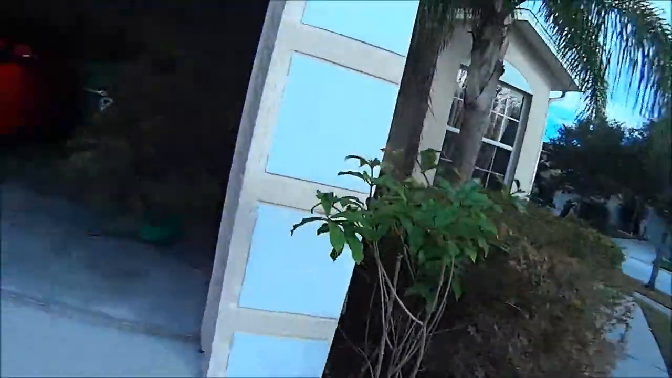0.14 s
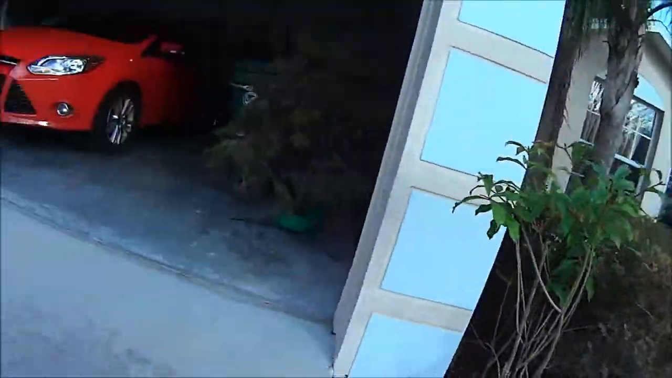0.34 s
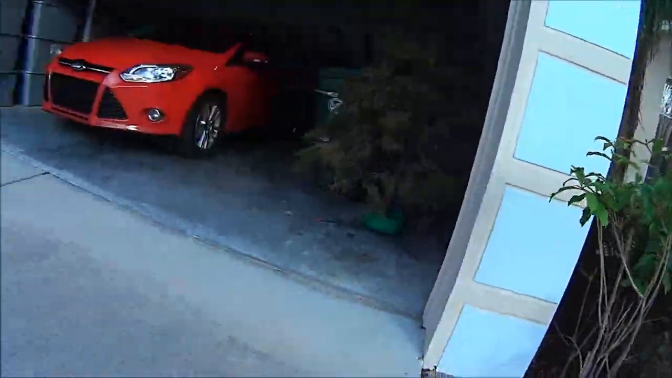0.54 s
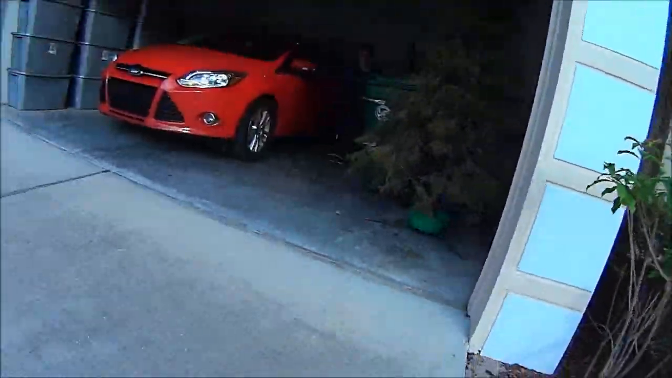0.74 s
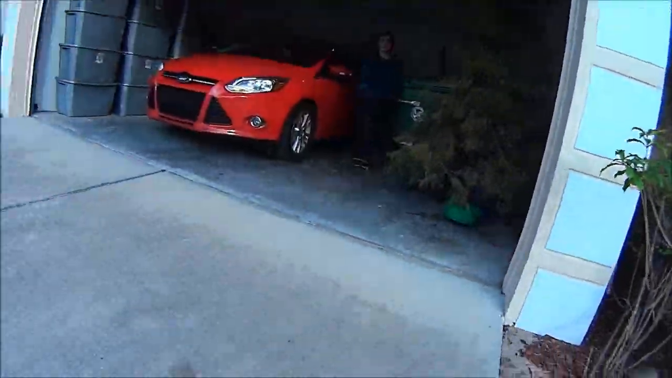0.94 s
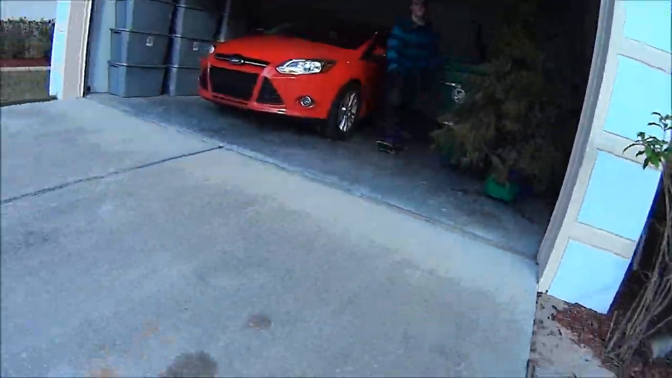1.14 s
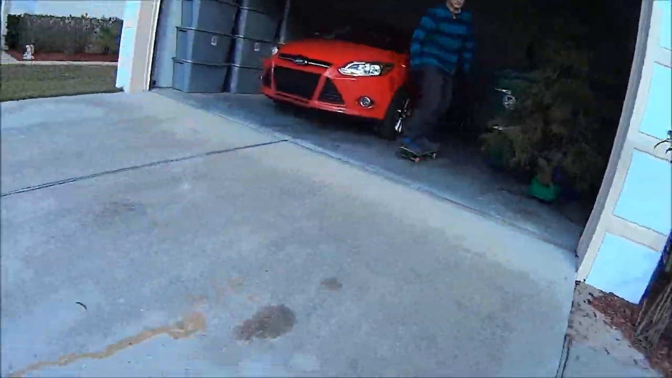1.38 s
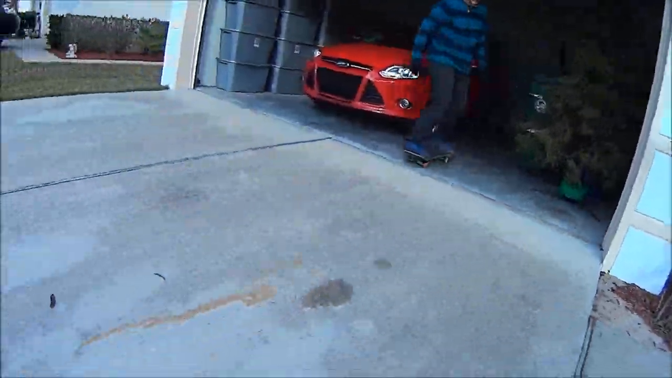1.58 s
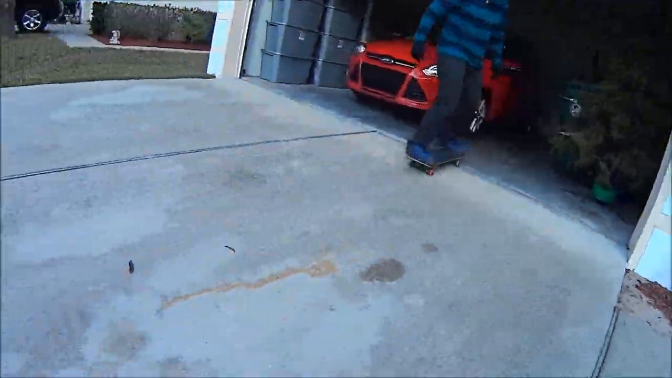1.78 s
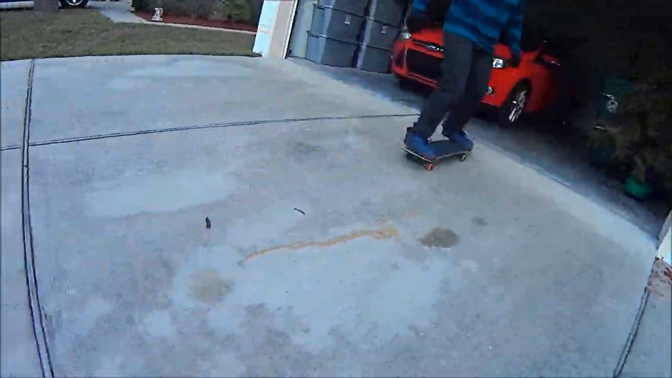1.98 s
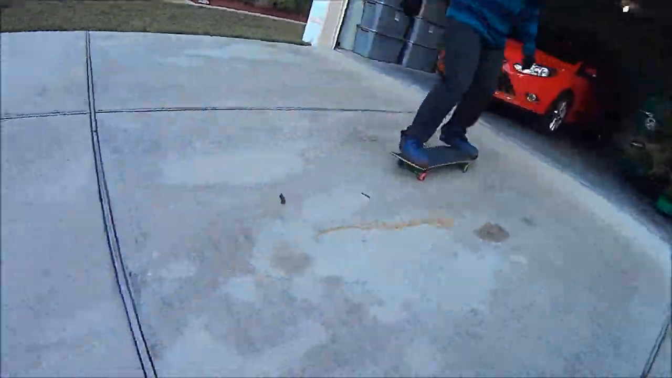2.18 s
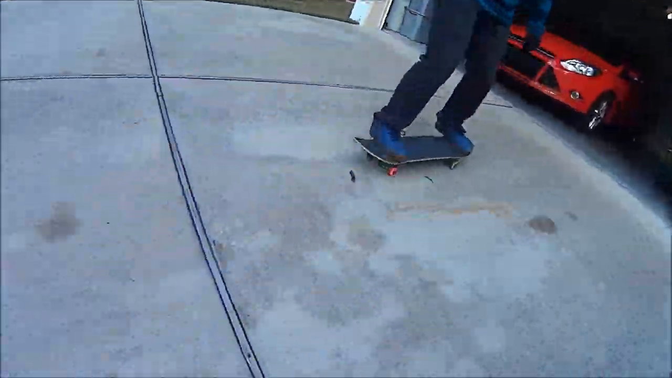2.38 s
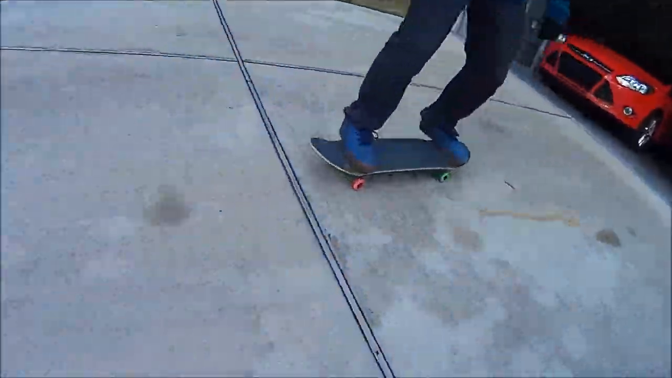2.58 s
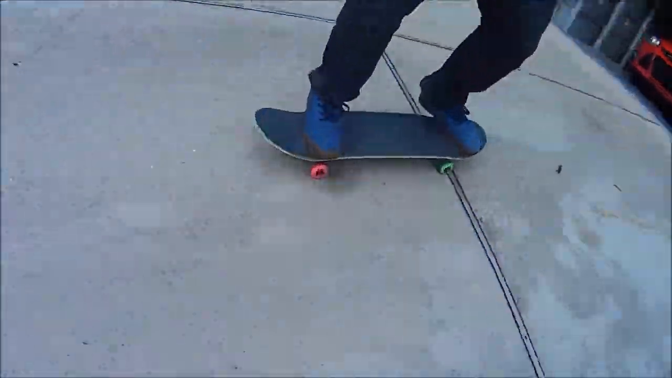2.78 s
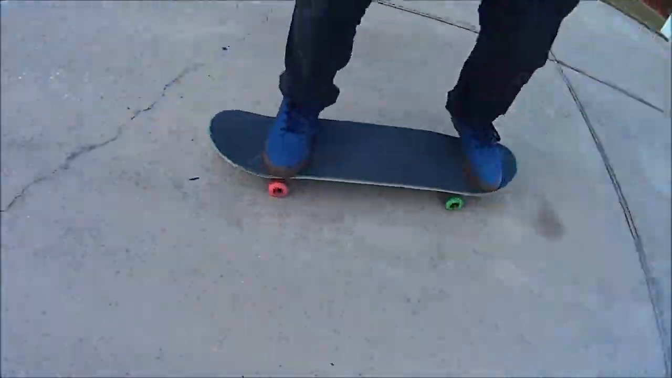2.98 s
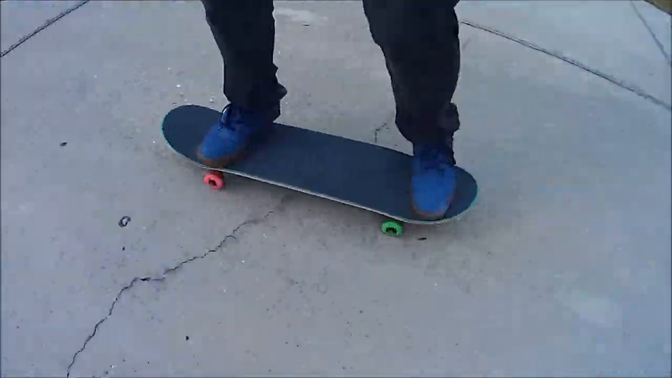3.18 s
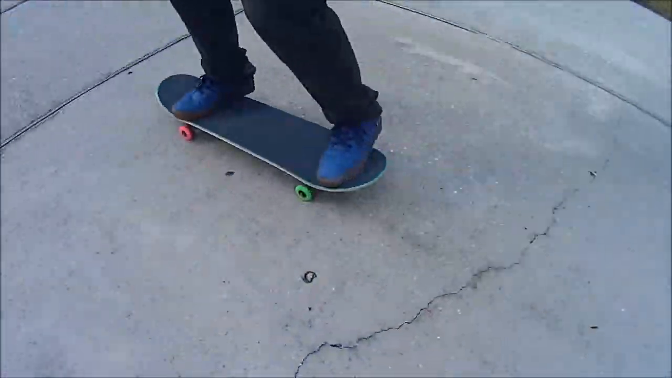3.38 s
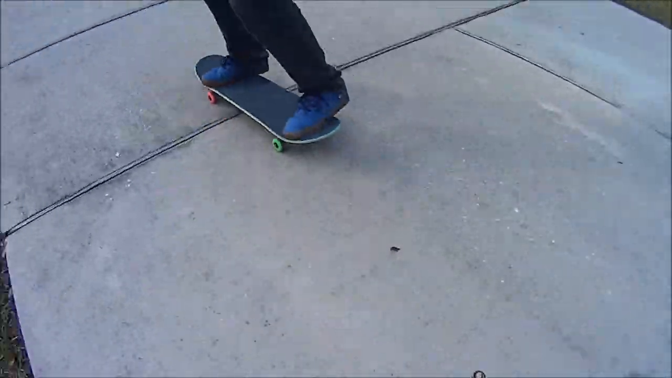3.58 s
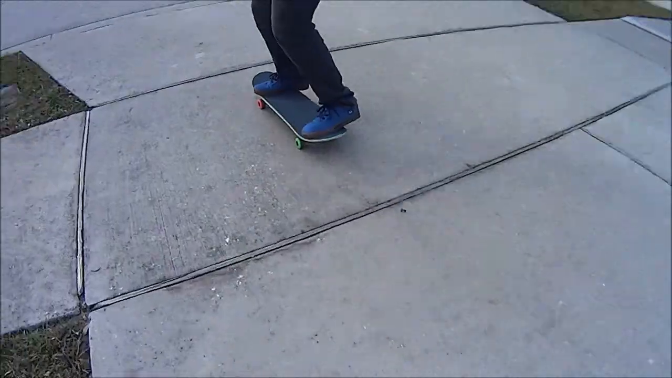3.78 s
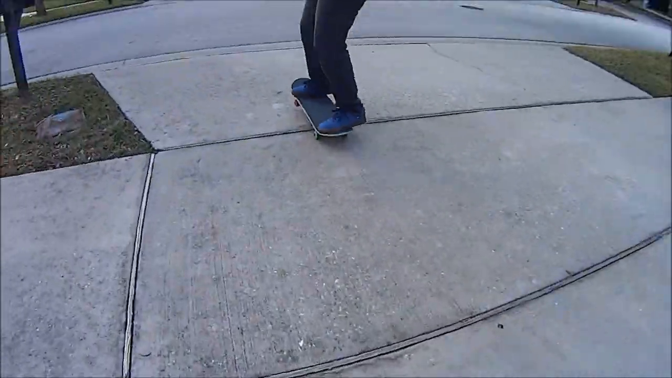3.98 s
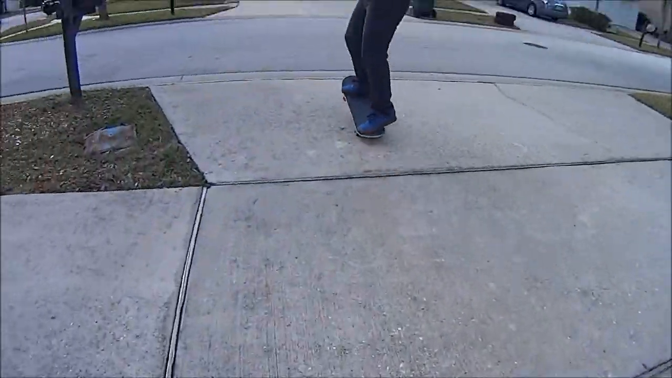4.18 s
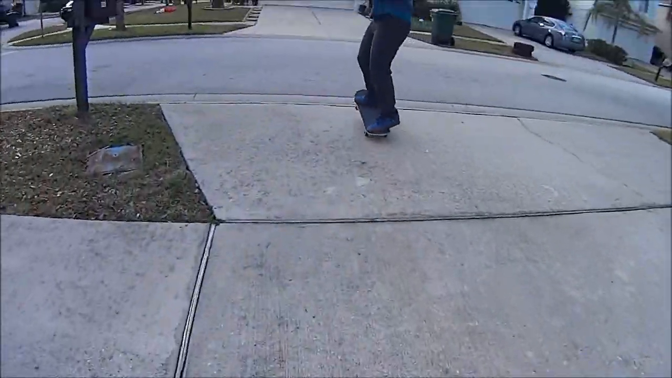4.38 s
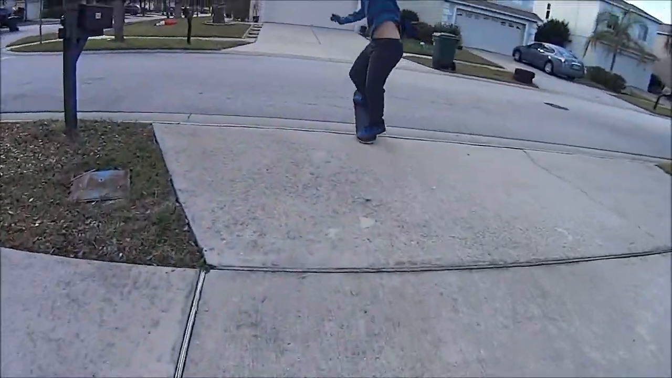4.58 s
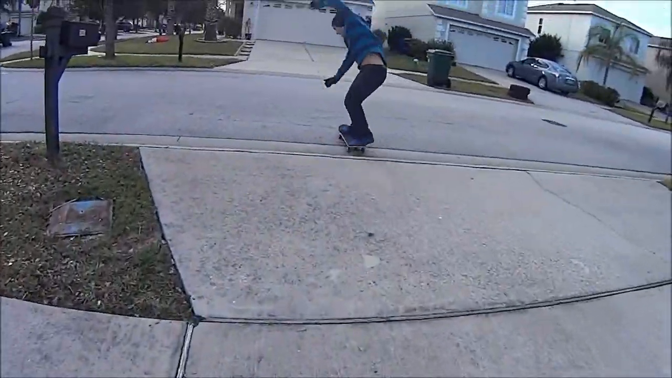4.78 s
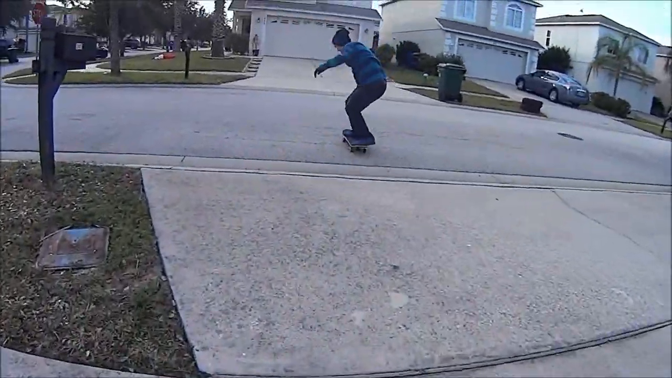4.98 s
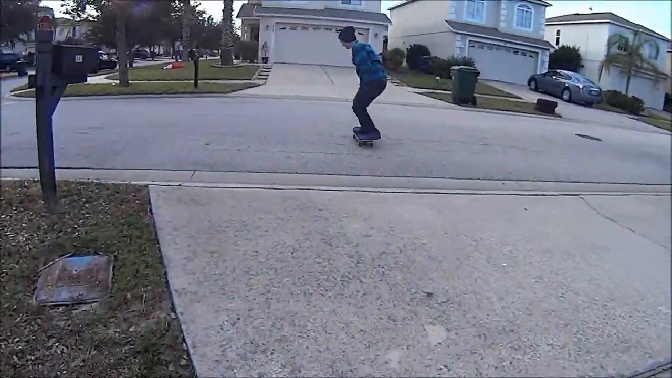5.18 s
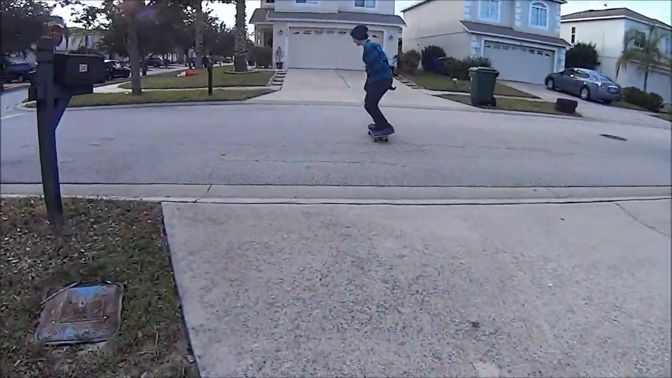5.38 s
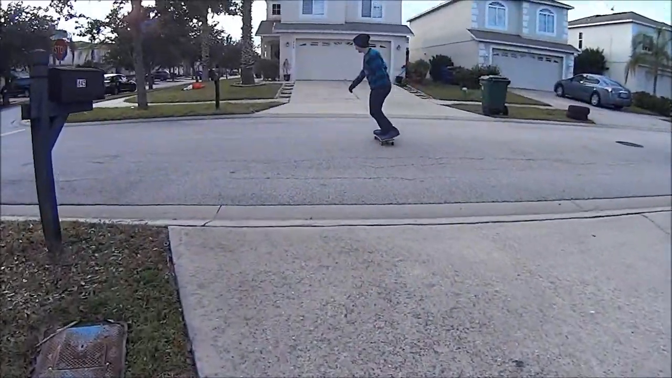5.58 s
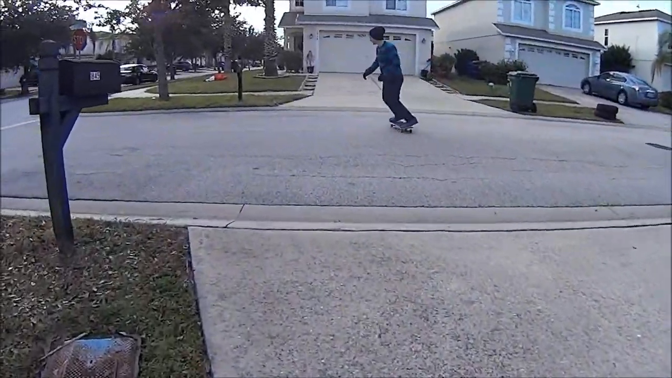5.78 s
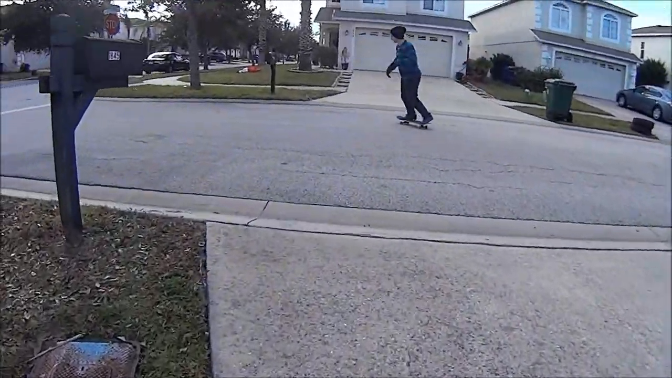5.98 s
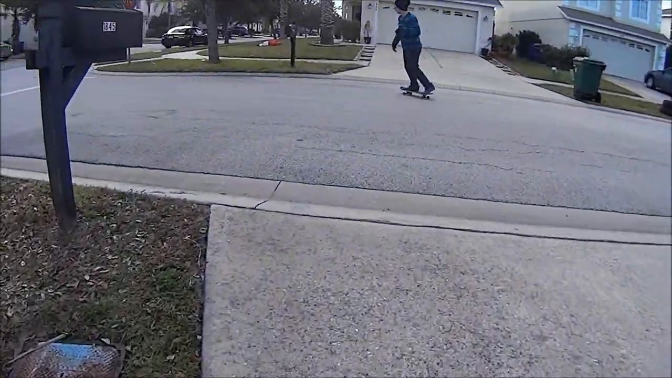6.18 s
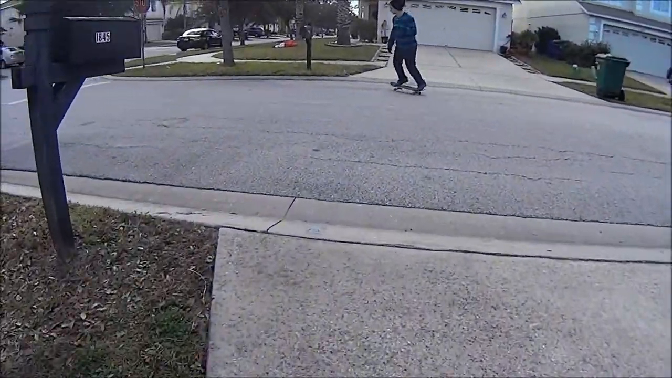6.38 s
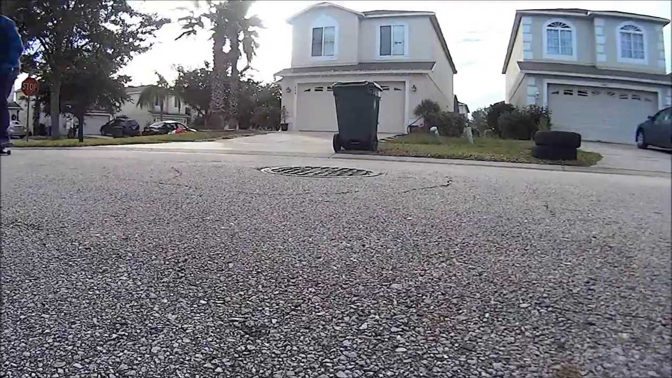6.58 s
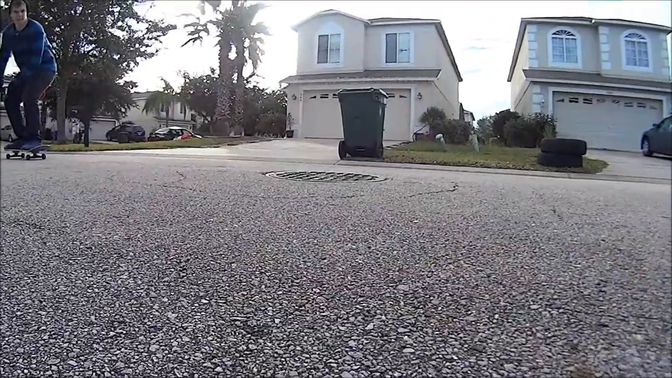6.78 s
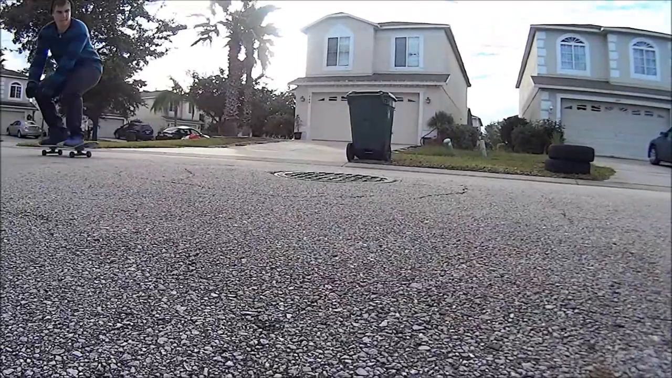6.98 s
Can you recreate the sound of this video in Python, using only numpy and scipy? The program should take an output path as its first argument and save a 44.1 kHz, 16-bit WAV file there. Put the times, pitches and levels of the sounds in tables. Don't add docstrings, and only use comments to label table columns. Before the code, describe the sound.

A skateboard starts faintly in a garage, rolls across a concrete drive and passes very close at about three seconds. Gritty rumble, hard clacks at slab joints, ticking stones and a dry pebble crack peak there, then recede onto the street. After an abrupt cut, the board rolls quietly on asphalt. The hand-held stereo microphones are sealed in a case, giving a hollow, ringing midrange tone over steady hiss and light low wind.

```python
import sys
import numpy as np
from scipy import signal
from scipy.fft import rfft, irfft, next_fast_len
from scipy.io import wavfile
from scipy.ndimage import uniform_filter1d

SR = 44100
rng = np.random.default_rng(int(sys.argv[2]) if len(sys.argv) > 2 else 0)


def unload_audio(sound):
    columns = np.transpose(np.atleast_2d(sound))
    steps = np.round(np.clip(columns, -1, 1) * 32767)
    wavfile.write(sys.argv[1], SR, steps.astype(np.int16))


def nominal_scale(level):
    x = np.asarray(level, float) / 20
    return 10 ** x


N = 310722


def evened(x):
    return x / np.sqrt(np.mean(x ** 2) + 1e-20)


def add(mix, start_s, sound):
    part = mix[..., round(start_s * SR):][..., :sound.shape[-1]]
    part += sound[..., :part.shape[-1]]


def wander(hz):
    lowpass = signal.butter(2, hz, fs=SR, output="sos")
    return evened(signal.sosfilt(lowpass, rng.standard_normal(N)))


def ring(hz, centre_hz, width_hz):
    return 1 / (1 + 2j * (hz - centre_hz) / width_hz) ** 2


# [t/s, rolling level/dB, deck flex/dB, grit coarseness/dB]
DRIVE_RIDE = [(0.0, -54, 3.5, -7), (.42, -50, 5.5, -1), (.58, -40.5, -4.5, -6.5), (.8, -42, -3, -3),
              (1.05, -42, 0.5, 0), (1.4, -40, -2.5, -1.5), (1.8, -38.5, 6, 0.5), (2.58, -29.5, -0.5, 1.5),
              (2.96, -24, 2, -2), (3.14, -25.5, 3.5, 4.5), (3.36, -23, 2, -3), (3.66, -31, 2, 2.5),
              (4.1, -26, -6, -10), (4.67, -35, 4.5, -1.5), (5.05, -36, 2, -3), (5.4, -43, 5.5, 0.5),
              (6.0, -38.5, -3, -2.5), (6.495, -38, 2, 2)]
# [t/s, rolling level/dB, deck flex/dB, grit coarseness/dB]
ASPHALT_RIDE = [
    (6.497, -41, 3.3, 4.3),
    (6.75, -38.5, 7, 3.5),
    (7.046, -40, 9.6, 2),
]
# [t/s, level/dB, fade/s]
SHUDDERS = [
    (1.585, 19, 0.04),
    (1.744, 8, 0.048),
    (2.6, 4, 0.13),
    (3.882, 8, 0.17),
]
# [t/s, level/dB, half length/s]
PAVING = [(0.684, 9, 0.11), (1.26, 2, .06), (2.929, 4.5, 0.067), (4.15, 4.5, 0.043), (3.827, 0, 0.064),
          (3.92, -1, 0.028), (4.663, -8, 0.016), (5.09, 2.5, 0.15), (5.83, 2, 0.033), (6.005, -2, 0.14),
          (6.595, 4.5, 0.044), (5.557, 0.5, 0.19), (6.17, 2.5, .03)]
# [level/dB at the reference, share of rolling, share of flex, share of grit]
LANE_LAW = [
    (-59.5, 0.77, 1.05, 0.47),
    (-52.5, 0.97, 1.2, 0),
    (-35.5, 0.96, 0, 0),
    (-56.5, 0.87, 0, 0.77),
    (-58.5, 0.77, 0.21, 0.83),
]


def rolling():
    reference_db = -35
    t = np.arange(N) / SR
    s, *controls = np.transpose(DRIVE_RIDE + ASPHALT_RIDE)
    level_db, flex_db, grit_db = (np.interp(t, s, control) for control in controls)
    for at, db, fade in SHUDDERS:
        level_db = level_db + db * (t > at) * np.exp(-abs(t - at) / fade)
    for at, db, half in PAVING:
        level_db = level_db + db * np.exp(-((t - at) / half) ** 2)
    lane_db = [db + roll_share * (level_db - reference_db) + flex_share * flex_db + grit_share * grit_db
               for db, roll_share, flex_share, grit_share in LANE_LAW]
    return nominal_scale(np.array(lane_db))


def lifted():
    t, sink = np.arange(N) / SR, np.ones(N)
    for s, *_ in hits():
        at = slice(round((s - 0.02) * SR), round((s + 0.02) * SR))
        sink[at] *= 1 - 0.6 * np.exp(-((t[at] - s) / 0.004) ** 2)
    return sink


def patchy(x, patchy_db):
    z = signal.stft(x, nperseg=512)[2]
    field = rng.standard_normal(z.shape[1:])
    field = uniform_filter1d(field, size=4, axis=0)
    field = evened(uniform_filter1d(field, size=50, axis=1))
    return signal.istft(z * nominal_scale(patchy_db * field), nperseg=512)[1][:, :N]


def wheels():
    taps_per_s = 900
    tap_db = 2.4 * np.minimum(rng.exponential(1, N), 4)
    taps = nominal_scale(tap_db) * (rng.random(N) < taps_per_s / SR)
    grit = patchy(rng.standard_normal((2, N)) * (1 + 0.13 * evened(taps)), patchy_db=2.0)
    flicker = nominal_scale(0.39 * wander(32) + 0.92 * wander(43)) * lifted()
    return (rolling() * flicker)[:, None] * evened(grit)


# [t/s, roar level/dB, rumble over roar/dB, rattle over roar/dB]
JOINTS = [(0.391, -34, -3.5, -16), (1.581, -21, -18, -31), (1.5886, -18.5, -9.5, -19),
          (1.6024, -25, -12, -27), (1.7378, -7, -19.5, -24.5), (1.7526, -19.5, -20, -20),
          (2.1783, -22, -23, -16), (2.5955, -14, -7, -18.5), (2.6038, -4, -17, -26),
          (2.608, -10.5, -23, -27), (2.7326, -3.5, -18.5, -42), (2.736, -20, -12, -19),
          (3.5053, -5, -15, -23.5), (3.5115, -16, -31, -25), (3.6158, -7.5, -12, -20),
          (3.6221, -19, -20, -16), (3.625, -5.5, -28, -28), (3.8806, -3.5, -23.5, -28.5),
          (3.9775, -6.5, -19.5, -31), (3.9837, -11, -31, -23), (4.589, -14.5, -8.5, -23),
          (4.6802, -11, -13, -19), (4.7026, -20.5, -9, -18), (4.7057, -8.5, -29, -31),
          (4.81, -27.5, -4, -20), (5.0683, -22, -15, -23.5), (5.855, -28, -23, -24),
          (5.8592, -23.5, -27, -18), (6.4437, -24, -11, -24), (6.7992, -21.5, -7.5, -30)]
# [t/s, roar level/dB]
STONES = [(0.6416, -25), (0.6938, -18.5), (0.704, -21), (1.2667, -21), (1.5949, -20), (1.639, -21),
          (1.809, -18.5), (2.2046, -19.5), (2.6238, -17), (2.6835, -13.5), (2.804, -8.5), (2.833, -12),
          (2.909, -11.5), (2.9249, -8), (3.168, -6.5), (3.192, -8), (3.2786, -6.5), (3.5009, -6),
          (3.5146, -6.5), (3.8994, -9), (3.916, -28), (3.951, -6.5), (3.9867, -4.5), (3.9917, -5.5),
          (4.099, -12.5), (4.236, -13.5), (4.294, -16), (4.597, -16.5), (4.6848, -12), (4.828, -16.5)]
# [t/s, roar level/dB]
GRAVEL = [(5.074, -18), (5.109, -18.5), (5.149, -18), (5.3514, -20.5), (5.634, -23), (5.6532, -21),
          (5.6824, -20), (5.8405, -22), (6.238, -17.5), (6.407, -22.5), (6.5988, -25), (6.615, -24.5),
          (6.8131, -23)]
# [rumble over roar/dB, rattle over roar/dB]
STONE_COLOUR = (-25, -33.5)
GRAVEL_COLOUR = (-23, -29.5)


def hits():
    joint = (0.033, 0.00051)
    stone = (0.032, 0.0017)
    return ([(*row, *joint) for row in JOINTS]
            + [(*row, *STONE_COLOUR, *stone) for row in STONES]
            + [(*row, *GRAVEL_COLOUR, *stone) for row in GRAVEL])


def blows():
    out, t = np.zeros((5, 2, N)), np.arange(6000) / SR
    rows = hits()
    rattles = rng.standard_normal((len(rows), 2, len(t)))
    swung = np.array([0, 0.3, 1, 0, 0])[:, None, None]
    rattled = np.array([0.6, 0.65, 0.12, 1, 0.48])[:, None, None]
    axle = np.sin(2 * np.pi * 1610 * t)
    onset = 1 - np.exp(-t / 0.00064)
    for (s, db, low_db, high_db, t60, swing_s), rattle in zip(rows, rattles):
        swings = 0.00015 / swing_s * axle * np.exp(-((t - 2 * swing_s) / swing_s) ** 2)
        fade = nominal_scale(-60 * t / t60) + nominal_scale(-25 - 60 * t / 0.7)
        blow = swung * swings + rattled * fade * onset * rattle
        lane_db = db + np.array([low_db - 10.5, low_db, 0, high_db, high_db])
        add(out, s - 2 * swing_s, nominal_scale(lane_db)[:, None, None] * blow)
    return out


LANES_HZ = [
    105,
    250,
    1050,
    2250,
    4250,
]
# [f/Hz, half width/Hz, depth 0-1]
DIPS = [
    (1085, 40, .6),
    (615, 35, .55),
]


def lanes(hz):
    orders = (6, 8, 12, 12, 12)
    above = [1 - 1 / (1 + (hz / edge) ** order) for edge, order in zip(LANES_HZ, orders)]
    dips = np.prod([1 - depth / (1 + ((hz - f) / width) ** 2) for f, width, depth in DIPS], axis=0)
    return -np.diff(above + [0 * hz], axis=0) * dips


def lane_gains():
    hz = np.fft.rfftfreq(4096, 1 / SR)
    case = sum(nominal_scale(db) * ring(hz, f, width) for f, width, db, *_ in CASE_RINGS)
    return 1 / np.sqrt(np.mean(abs(lanes(hz) * case) ** 2, 1))


# [t/s, level/dB, body over crack/dB]
PEBBLES = [
    (0.426, -38.5, 5),
    (2.6466, -12.5, -2),
    (3.3218, -8, -11),
]


def pebbles():
    out, t = np.zeros((2, N)), np.arange(500) / SR
    crack = -np.exp(-t / 0.0006) * np.sin(2 * np.pi * 2850 * t) * (1 - np.exp(-t / 0.0001))
    body = np.exp(-t / 0.0042) * np.sin(2 * np.pi * 1660 * t)
    chime_shape = np.exp(-(t / 0.0028) ** 3) * (1 - np.exp(-t / 0.00017))
    chime = 0.4 * np.sin(2 * np.pi * 4780 * t) * chime_shape
    splinters = uniform_filter1d(rng.standard_normal((len(PEBBLES), 2, len(t))), size=3)
    splinters = splinters * 0.45 * np.exp(-t / 0.002)
    for (s, db, body_db), bits in zip(PEBBLES, splinters):
        snap = crack + nominal_scale(body_db) * body + chime + bits
        add(out, s + 0.00107, nominal_scale(db - 1) * snap * nominal_scale([[-1.5], [1.5]]))
    return out


# [t/s, length/s, level/dB, f/Hz, width/Hz]
SCUFFS = [(0.062, 0.16, -61.5, 3430, 1100), (0.056, .16, -56, 5400, 1900), (0.091, 0.073, -70.5, 480, 260),
          (0.39, 0.044, -63, 750, 690), (0.797, 0.024, -60, 5130, 800), (1.7335, .022, -42.5, 940, 180),
          (3.321, 0.0055, -26, 5750, 1000), (2.646, 0.0072, -32.5, 5700, 790),
          (1.582, 0.024, -50.5, 2090, 510), (1.746, 0.0087, -52, 1800, 550),
          (1.879, 0.0033, -46.5, 8000, 7400), (2.722, 0.011, -40, 5240, 5170),
          (2.978, 0.15, -47.5, 3660, 400), (4.7, .6, -101, 2400, 300), (6.74, 0.29, -62, 600, 330),
          (.06, .14, -61, 9400, 900), (3.4995, .022, -40, 2070, 380), (3.5, 0.026, -43, 1240, 250),
          (4.6795, .034, -46, 800, 120), (6.246, .008, -47, 8500, 3300), (6.437, .008, -44, 8100, 4100),
          (1.181, 0.16, -61.5, 5240, 1500), (3.605, 0.039, -44.5, 1200, 250)]
# [t/s, length/s, level/dB, f/Hz, width/Hz]
DRONES = [(1.72, 1.5, -60, 149, 63), (1.575, 0.023, -49.5, 110, 110), (2.612, .035, -46.5, 82, 140),
          (3, 0.27, -57, 150, 110), (6.0, 0.37, -65, 125, 50), (2.4, .45, -59.5, 210, 66),
          (4.9, 1.5, -68, 250, 250), (6.68, 0.4, -64, 140, 73), (2.85, 0.66, -54.5, 518, 92),
          (2.95, 0.39, -49, 747, 200), (2.715, .04, -49, 250, 230), (0.55, 0.72, -74, 650, 170),
          (5.2, 0.64, -67, 950, 380)]


def rubs():
    out = np.zeros((2, N))
    for s, length, db, f, width in SCUFFS + DRONES:
        size = round(length * SR)
        band = ring(np.fft.rfftfreq(size, 1 / SR), f, width)
        rub = irfft(rfft(rng.standard_normal((2, size))) * band, size)
        add(out, s, nominal_scale(db + 33.5) * evened(rub) * np.hanning(size) ** 0.4)
    return out


def scene():
    size = next_fast_len(N + 4096)
    parts = lane_gains()[:, None, None] * (wheels() + blows())
    spectrum = rfft(parts, size) * lanes(np.fft.rfftfreq(size, 1 / SR))[:, None]
    return irfft(spectrum.sum(0), size)[:, :N] + rubs()


# [t/s, level/dB]
KNOCKS = [
    (0.426, -34),
    (6.435, -36.5),
]


def knocks():
    out, t = np.zeros(N), np.arange(3000) / SR
    swing = -np.sin(2 * np.pi * 118 * t) * nominal_scale(-60 * t / 0.042) * (1 - np.exp(-t / 0.002))
    buzz = 0.34 * np.sin(2 * np.pi * 600 * t) * nominal_scale(-60 * t / 0.03)
    for s, db in KNOCKS:
        add(out, s + 0.0014, nominal_scale(db + 12) * (swing + buzz))
    return out


# [t/s, level/dB, half length/s]
GUSTS = [
    (0.312, 1, .12),
    (2.0, 6.5, 0.27),
    (3.16, 9, 0.7),
    (4.398, 10, 0.19),
    (5.568, 5, 0.11),
    (6.69, 6, .1),
]


def wind():
    breeze_db, wind_hz = -67.5, 40.8
    t = np.arange(N) / SR
    gust_db = sum(db * np.exp(-((t - s) / half) ** 2) for s, db, half in GUSTS)
    shared = wander(wind_hz)
    difference = 0.1 * wander(wind_hz) * np.array([[1], [-1]])
    return nominal_scale(breeze_db + gust_db) * (shared + difference)


# [f/Hz, level/dB per Hz]
HISS_COLOUR = [(12, -38), (20, -13), (161, -26), (221, -16), (688, -31), (1020, -26), (1600, -10.5),
               (2140, -24), (11000, -28), (14300, -77), (22000, -120)]


def hiss():
    hiss_db = -56.5
    hz = np.fft.rfftfreq(N, 1 / SR)
    f, db = np.transpose(HISS_COLOUR)
    a, b = rfft(rng.standard_normal((2, N)))
    same = 0.4 + 0.29 / (1 + (hz / 250) ** 2)
    both = np.array([a, same * a + np.sqrt(1 - same ** 2) * b])
    colour = nominal_scale(np.interp(np.log(hz + 1), np.log(f + 1), db))
    return nominal_scale(hiss_db) * evened(irfft(both * colour, N))


# [f/Hz, width/Hz, level/dB, left over right/dB, left lead/rad, likeness 0-1]
CASE_RINGS = [(179.7, 69, -22, 0, 0.5, 1), (346, 62, -19, 0, 0.84, 1), (500, 104, -17, -2, 0.94, 0.76),
              (812, 227, -18, -1.5, 1.07, 0.91), (939, 83, -24, -7.5, -0.1, 0.88),
              (1394, 270, -7.5, -3.5, 1.25, 0), (1599, 244, 3, -2, 0.7139, 1),
              (1860, 180, -16.5, -4.5, 2.8, 0), (1970, 1800, -32.5, -8, -4.5, 0.8),
              (2880, 140, -13.5, 6, 3, 0.62), (3140, 430, -25.5, -17, -2.5, 0.26),
              (3450, 510, -23, 11.5, 3.5, 0.4), (4480, 350, -30, -3.5, 3.5, 0.8),
              (5035, 390, -23.5, -0.5, 1, 1), (5800, 710, -32.5, 2.5, 3.5, 0.16),
              (7500, 640, -34.5, 4.5, 1, 0.5), (9400, 1400, -36, 0, 1.1, 0.74)]


def in_case(dry):
    size = next_fast_len(N + 4096)
    hz = np.fft.rfftfreq(size, 1 / SR)
    straight, scattered = rfft(dry, size)
    out = np.zeros((2, len(hz)), complex)
    for f, width, db, pan_db, lead, same in CASE_RINGS:
        delay = np.exp(-1j * lead * np.minimum(2 * hz / f, 1))
        right = (same * straight + np.sqrt(1 - same ** 2) * scattered) * delay
        pair = np.array([nominal_scale(pan_db / 2) * straight, nominal_scale(-pan_db / 2) * right])
        out += nominal_scale(db) * ring(hz, f, width) * pair
    return irfft(out, size)[:, :N]


def top_cut(x):
    return signal.sosfilt(signal.butter(12, 11680, fs=SR, output="sos"), x)


def record(dry):
    heard = in_case(dry) + pebbles() + knocks() + wind() + hiss()
    treble_limit = signal.firwin(511, 11050, window=("kaiser", 9), fs=SR)
    limited = signal.oaconvolve(heard, treble_limit[None], "same")
    t = np.arange(N) / SR
    fades = np.interp(t, [6.49615, 6.4962, 6.52, 7.04, 7.046], [1, 0.2, 1, 1, 0])
    return top_cut(limited * fades)


dry = scene()
out = record(dry)
unload_audio(out)
```